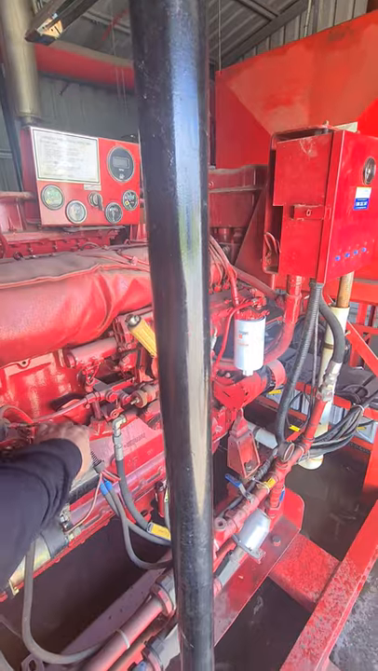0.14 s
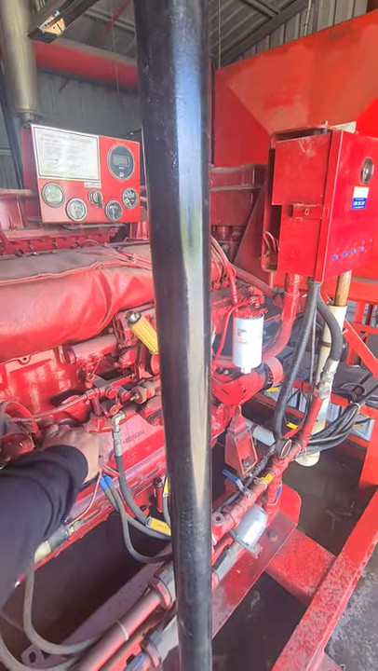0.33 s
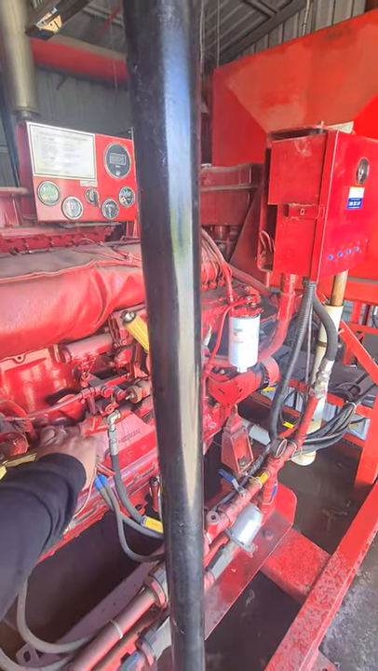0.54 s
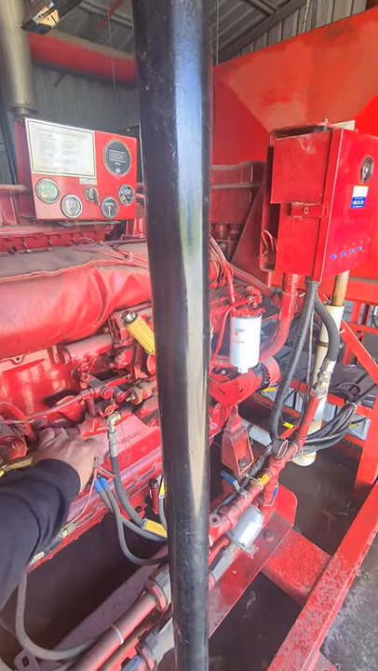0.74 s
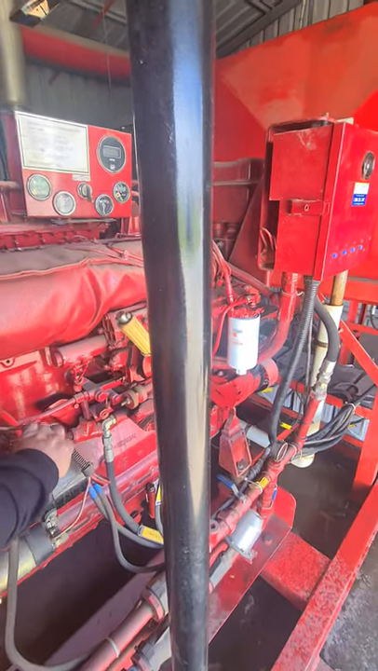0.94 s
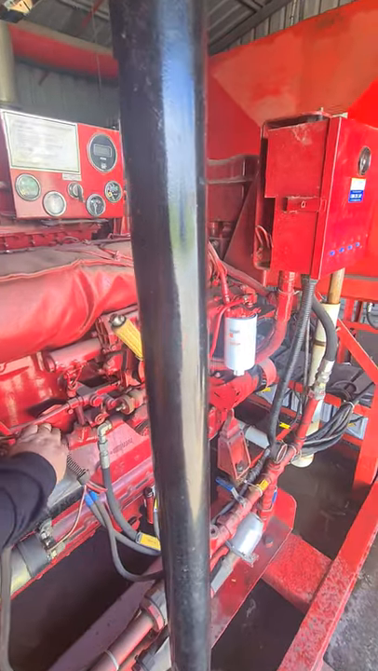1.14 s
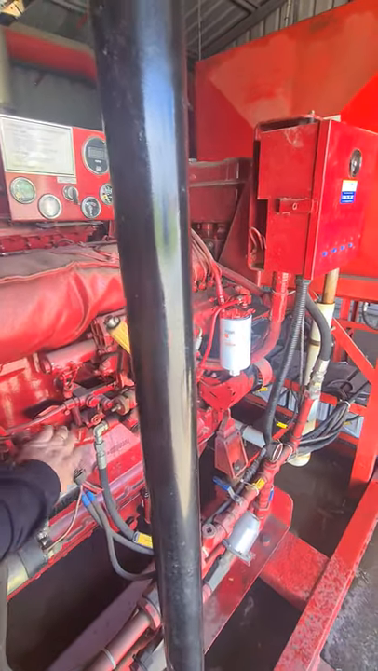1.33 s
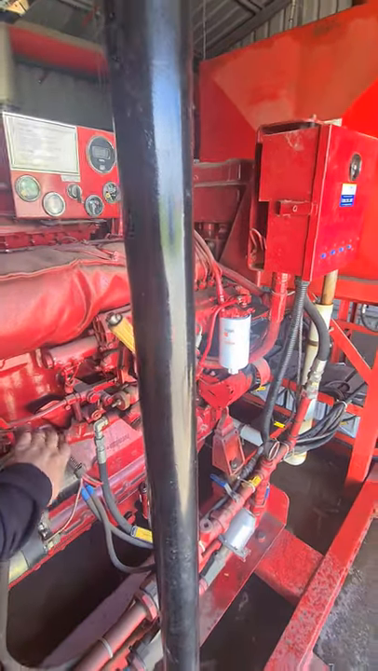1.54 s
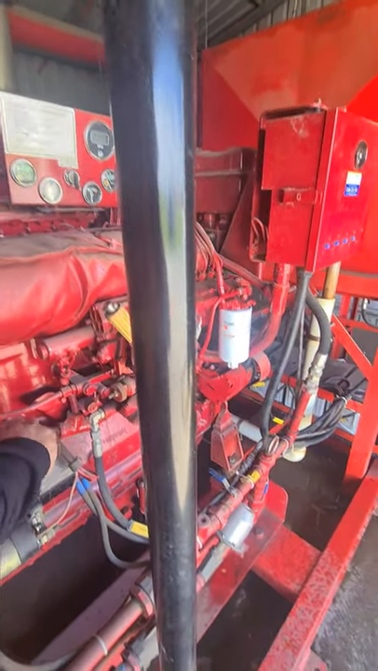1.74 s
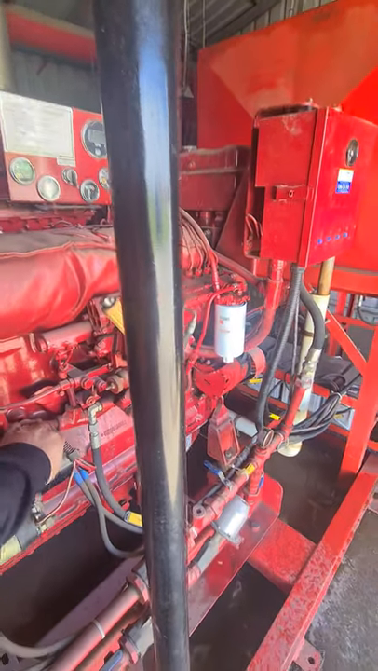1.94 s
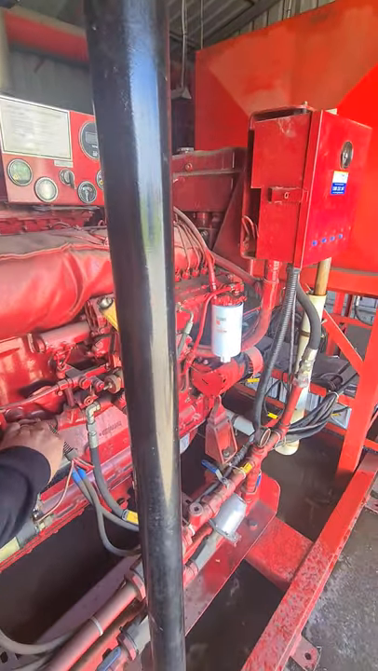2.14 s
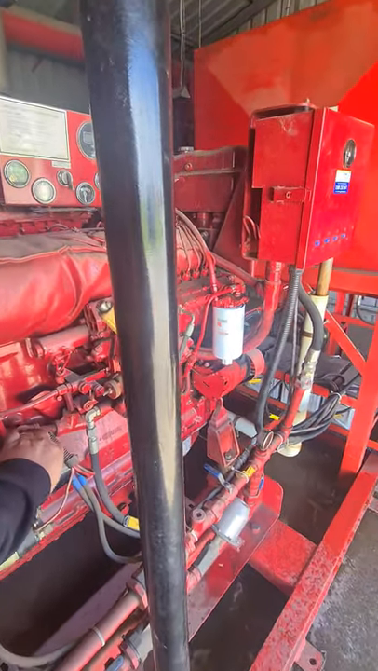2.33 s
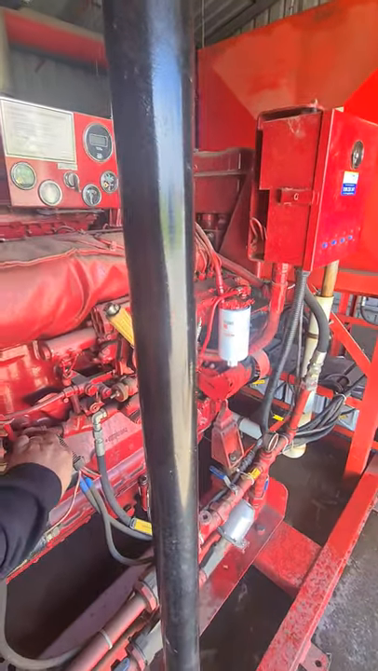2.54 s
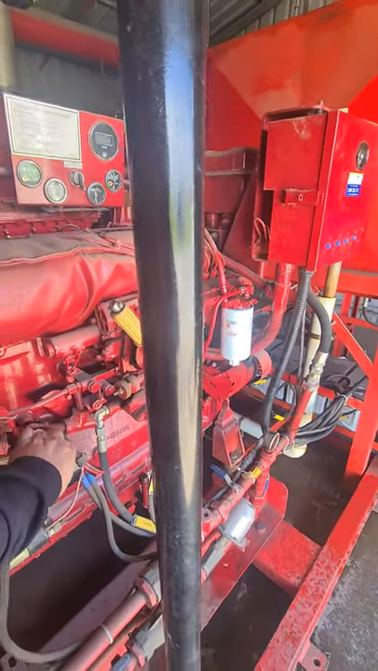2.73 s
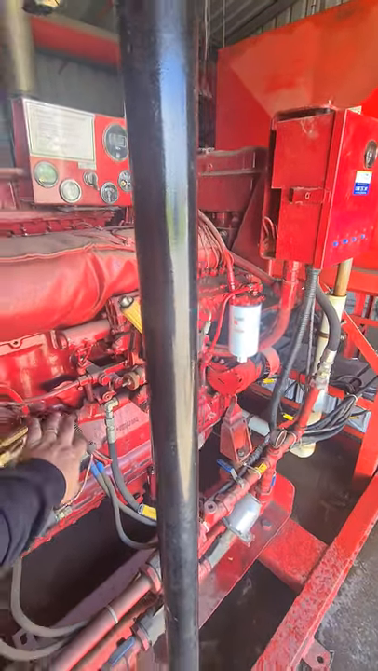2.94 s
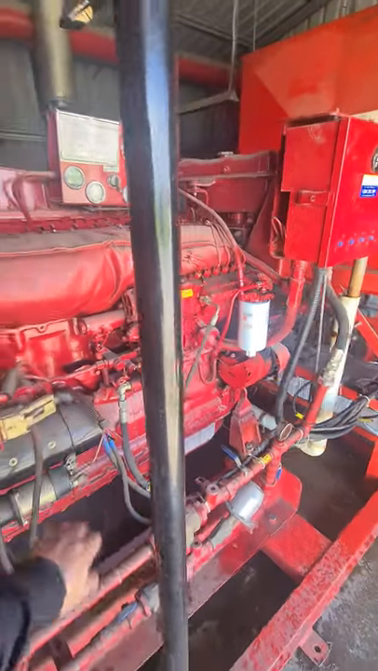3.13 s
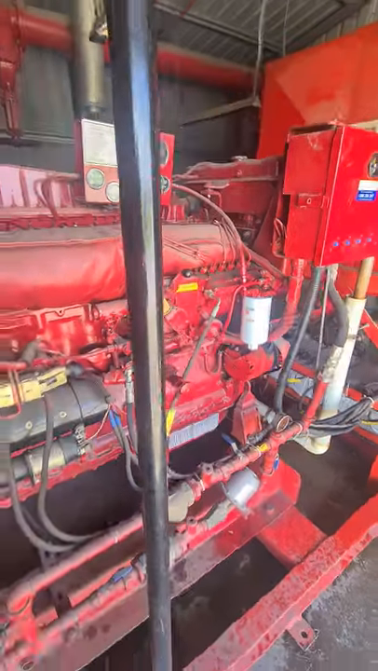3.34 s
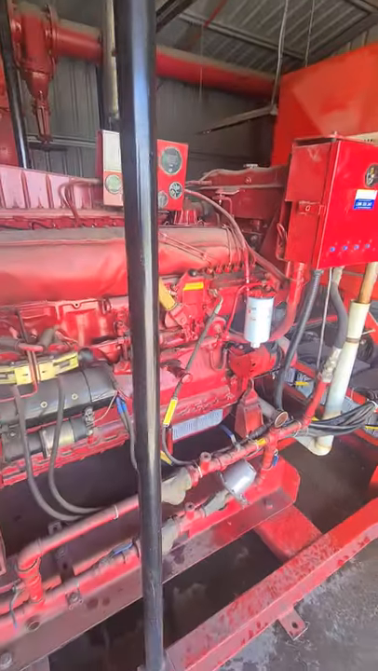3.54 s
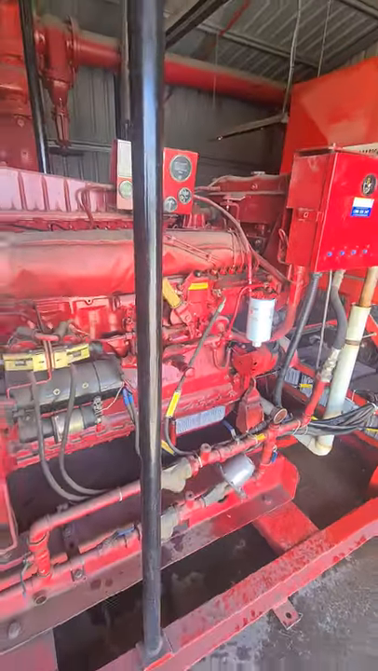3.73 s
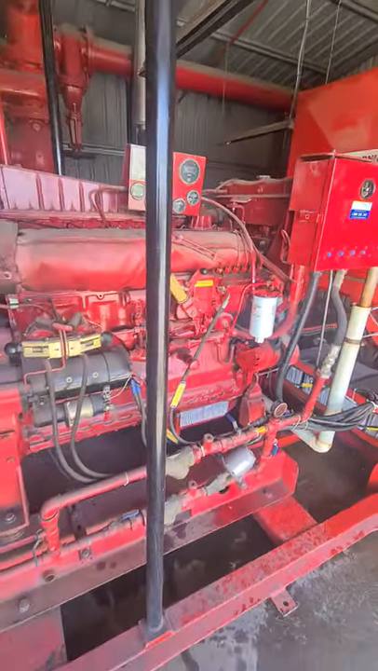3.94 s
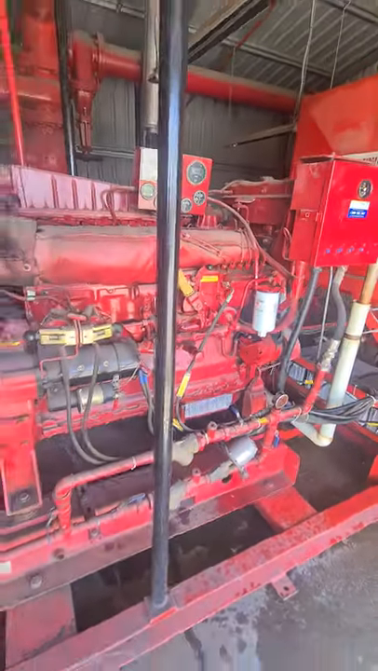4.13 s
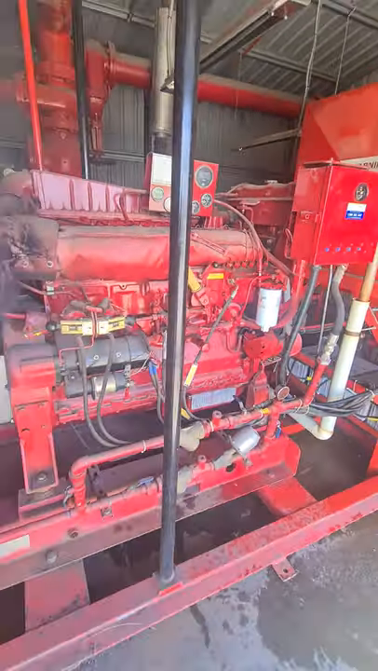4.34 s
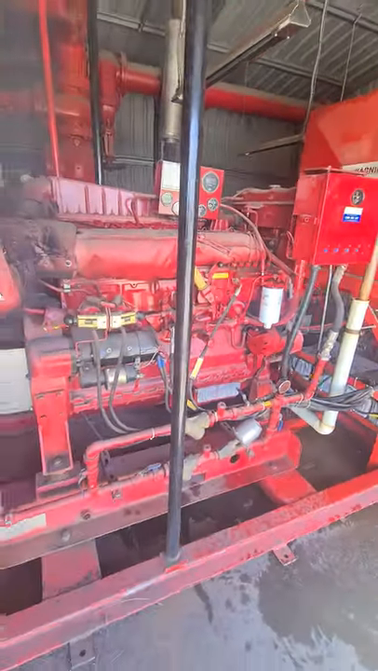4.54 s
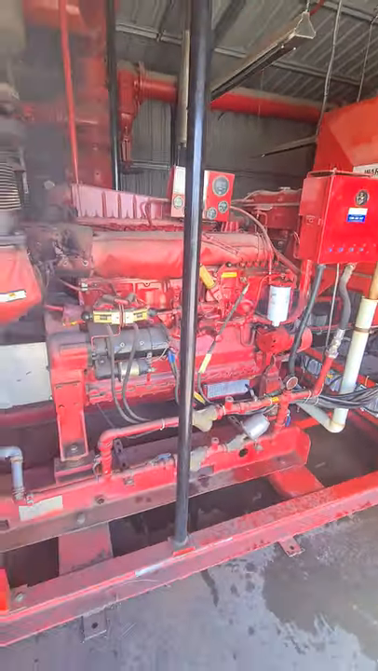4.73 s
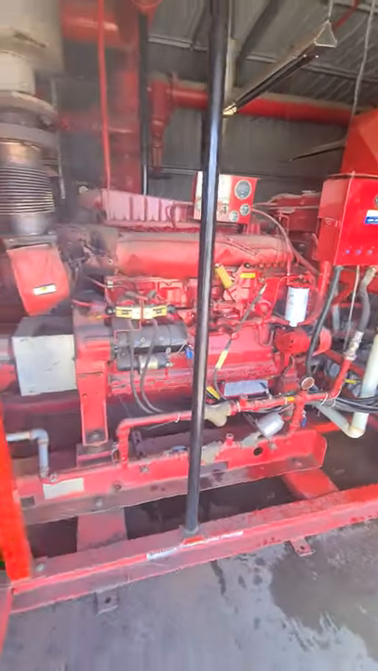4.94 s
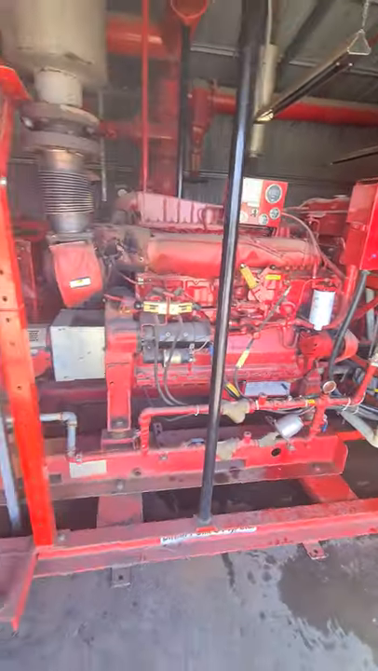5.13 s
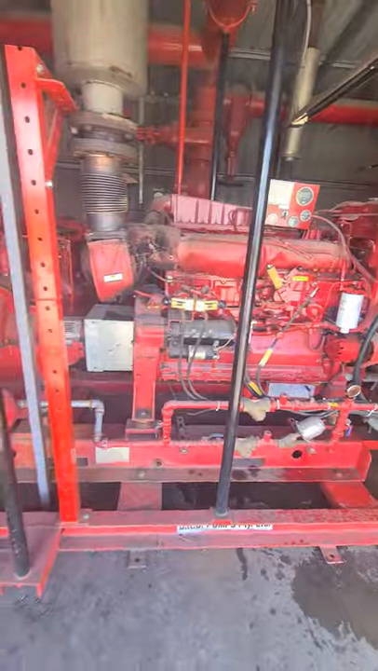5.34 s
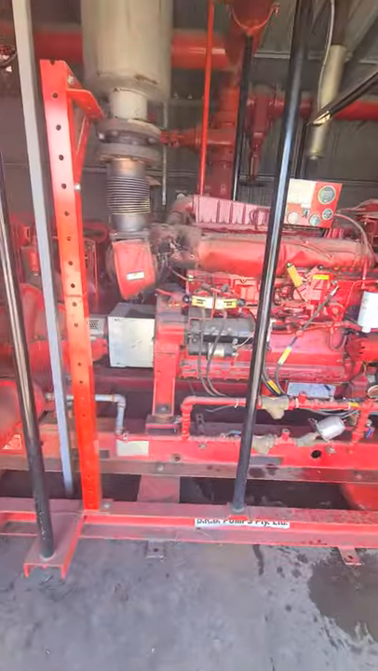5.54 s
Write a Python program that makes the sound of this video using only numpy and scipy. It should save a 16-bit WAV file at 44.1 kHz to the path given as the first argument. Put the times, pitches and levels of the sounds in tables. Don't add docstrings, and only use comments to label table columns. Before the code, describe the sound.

A low, quiet hum fills a steel pump house, heard through a close stereo microphone. At 0.3 s a few light lever clicks sound. Around 0.95-1.1 s hard metal cracks and a heavy thud mark the starter pinion slamming in; it slips, with two faint, very high squeals at 1.2-1.4 s and smaller knocks to 1.5 s. After a lull, light ticks at 1.95 s lead to a second, heavier clunk at 2.1-2.2 s, the casing shaking with rough gear noise. Cranking from 2.45 s becomes firing by 2.6 s; low separate puffs quicken and merge as the diesel climbs, with repeating valve clatter, pulsing hiss and a fluttering high intake whistle. One sharp clack lands at 3.03 s. Speed peaks slightly near 4.5 s and settles into a dense, steady drone; the whistle fades. From 4.8 s the listener steps back, slightly softening the block noise until the end at about 5.7 s.

```python
import sys
import numpy as np
from scipy import signal
from scipy.io import wavfile
from scipy.ndimage import uniform_filter1d

SR = 44100
rng = np.random.default_rng(int(sys.argv[2]) if len(sys.argv) > 2 else 0)


def makeup_ratio(level_db):
    decades = np.asarray(level_db, float) / 20
    return 10 ** decades


def inscribe(sig):
    pcm = np.round(np.clip(np.atleast_2d(sig).T, -1, 1) * 32767)
    wavfile.write(sys.argv[1], SR, pcm.astype(np.int16))


N = 250929
TIME = np.arange(N) / SR
CYLINDERS = 6
GOVERNED_PER_S, SETTLES_S, SETTLE_TIME_S = 108, 4.25, 0.27


def rms_one(x):
    return x / np.sqrt(np.mean(x ** 2) + 1e-20)


def in_time(rows):
    s, *columns = np.transpose(rows)
    inside = np.clip(np.minimum(TIME - s[0], s[-1] + 0.05 - TIME) / 0.008, 0, 1)
    return [np.interp(TIME, s, column) for column in columns], inside


def at_hz(points, hz):
    points_hz, values = np.transpose(points)
    return np.interp(np.log(hz), np.log(points_hz), values)


def drift(rate_hz):
    r = np.exp(-128 * np.pi * rate_hz / SR)
    slow = signal.lfilter([1], [1, -2 * r, r * r], rng.standard_normal(N // 64 + 1002))[1000:]
    return np.interp(np.arange(N) / 64, np.arange(len(slow)), rms_one(slow))


def filtered(x, order, hz, kind):
    return signal.sosfilt(signal.butter(order, hz, kind, fs=SR, output="sos"), x)


def resonance(x, hz, width_hz):
    r = np.exp(-np.pi * width_hz / SR)
    zeros = np.array([1, 0, -1]) * (1 - r * r) / 2
    return signal.lfilter(zeros, [1, -2 * r * np.cos(2 * np.pi * hz / SR), r * r], x)


# (frequency [Hz], correlation [-1 to 1])
LIKENESS = [(60, 0.99), (130, 0.95), (290, 0.94), (640, 0.33), (1410, -0.062), (3100, -0.018),
            (6820, 0.033), (15000, -0.13)]
# (frequency [Hz], difference [dB])
LEAN = [(60, -1.5), (130, -1.5), (290, -2.5), (640, -3), (1410, 0.5), (3100, -1), (6820, 6.5),
        (15000, -4.5)]


def spread(mid, side, hz):
    alike = np.clip(at_hz(LIKENESS, hz), -1, 1)
    lean = makeup_ratio(at_hz(LEAN, hz) / 2 * np.array([[1], [-1]]))
    return lean * (np.sqrt(1 + alike) * mid + np.sqrt(1 - alike) * side * [[1], [-1]]) / np.sqrt(2)


def coloured(source, spectrum, splits_hz, levels_db, patchy_db):
    edges = 28 * 2 ** (np.arange(29) / 3)
    centres = np.sqrt(edges[1:] * edges[:-1])
    region = np.searchsorted(splits_hz, centres)
    power = makeup_ratio(2 * at_hz(spectrum, np.minimum(centres, SR / 3))) * np.diff(edges)
    gains, out = [makeup_ratio(db) for db in levels_db], 0
    for k, hz in enumerate(centres):
        mid, side = rms_one(filtered(source(k, hz), 2, edges[k:k + 2], "band"))
        share = np.sqrt(power[k] / power[region == region[k]].sum())
        level = share * gains[region[k]] * makeup_ratio(patchy_db * drift(6.2))
        out = out + spread(mid, side, hz) * level
    return out


# (frequency [Hz], density [dB per Hz])
HUM = [(15, -60), (25, -19), (48, -14.5), (70, -3.5), (128, -24), (273, -22.5), (378, -31.5), (496, -29),
       (568, -29), (617, -29.5), (878, -34.5), (1030, -34), (1980, -39), (5570, -47.5), (16500, -75.5)]


def hum():
    white = rng.standard_normal((2, 2, N))
    return coloured(lambda k, hz: white[k % 2], HUM, [], [-37], patchy_db=-3.0)


def pump_house(x, t60_s, cut_hz):
    t = TIME[:int(SR * 0.9)]
    tail = rng.standard_normal((2, len(t))) * makeup_ratio(-60 * t / t60_s) * (t > 0.004)
    tail = filtered(tail, 1, cut_hz, "low")
    tail = tail / np.sqrt(np.sum(tail ** 2, axis=1, keepdims=True))
    return signal.fftconvolve(x, tail, axes=1)[:, :N]


# (time [s], peak [dB], top above 7 kHz [dB], part struck [Hz])
TICKS = [(0.3007, -37, -55, 3000), (0.336, -23, -36, 6630), (0.343, -14.5, -27, 4030),
         (0.3476, -16.5, -36, 6600), (0.3602, -21, -40, 2100), (0.3654, -21, -35, 3750),
         (0.919, -30, -48, 5350), (0.9869, -5.5, -11.5, 3040), (1.0035, 4, -7, 2990),
         (1.022, 4.5, -40, 480), (1.0998, -4, -3.5, 3570), (1.2732, -7, -27, 1680),
         (1.3044, -15, -21, 2120), (1.4711, -15, -35, 1400), (1.922, -36, -64, 1450),
         (1.934, -25, -47, 2490), (1.948, -37, -35, 5100), (1.958, -18.5, -29, 5070),
         (1.9704, -28, -40, 5000), (2.1249, -2.5, -26, 5100), (2.1368, 2, -11, 6200), (2.155, -4, -12, 895),
         (2.166, 3.5, -5, 2730), (2.1714, -1.5, -22, 2200), (2.184, 6, -40, 258), (2.3361, -11, -26, 2060),
         (2.3535, -12, -26, 2080), (2.4024, -13, -31, 5900), (2.61, -23, -36, 5800),
         (3.033, -2.5, -9, 2130)]
# (frequency [Hz], level [dB], t60 [s])
LEVER = [(1545, -6, .035), (2130, -2, .045), (2990, -4, .03), (4050, -3, .03), (5350, -4, .03),
         (6000, -4, .03), (6600, -4, .022)]


def ticks():
    out, after_s = np.zeros((2, N)), TIME[:SR // 4]
    modes_hz = np.array(LEVER)[:, 0]
    white = rng.standard_normal((len(TICKS), 2, len(after_s)))
    luck = rng.standard_normal((len(TICKS), len(LEVER)))
    for (s, peak_db, top_db, part_hz), noise, chance in zip(TICKS, white, luck):
        t60_s = 0.045 + 24.0 / part_hz
        ring_db = -12 - 0.2 * peak_db
        fall = (1 - np.exp(-after_s / 0.0011)) * makeup_ratio(-60 * after_s / t60_s)
        body = filtered(noise, 2, [part_hz / 4, min(part_hz * 2, 7500)], "band")
        top = filtered(noise, 3, 7000, "high")
        sound = makeup_ratio(peak_db - 15) * fall * rms_one(body)
        sound += makeup_ratio(top_db - 5.5) * fall * rms_one(top)
        octaves_off = np.abs(np.log2(modes_hz / part_hz))
        reach_db = 2 * chance - np.minimum(30 * octaves_off, 8)
        for (hz, db, ring_t60_s), near_db in zip(LEVER, reach_db):
            r, w = makeup_ratio(-60 / (ring_t60_s * SR)), 2 * np.pi * hz / SR
            ring = signal.lfilter([0, np.sin(w)], [1, -2 * r * np.cos(w), r * r], noise * fall ** 4)
            sound += makeup_ratio(peak_db + ring_db + db + near_db) * ring / np.abs(ring).max()
        start = round(s * SR)
        out[:, start:start + len(after_s)] += sound
    return out


def whistle(track, gate, half_width_hz, wander_hz):
    (hz, db), on = in_time(track)
    narrow = signal.butter(2, half_width_hz, fs=SR, output="sos")
    slow = signal.sosfilt(narrow, rng.standard_normal((2, 2, N)))
    angle = 2 * np.pi * np.cumsum(hz + wander_hz * drift(18.0)) / SR
    band = rms_one(slow[0] * np.cos(angle) + slow[1] * np.sin(angle))
    return on * gate ** 2 * makeup_ratio(db + 1.2 * drift(20.0)) * spread(*band, 6400)


# (time [s], frequency [Hz], level [dB])
SQUEAL = [
    (1.17, 10000, -48),
    (1.24, 10000, -44),
    (1.29, 9900, -63),
    (1.35, 10000, -41),
    (1.38, 10000, -65),
]


def pinion_squeal():
    return whistle(SQUEAL, 1, 250, wander_hz=50)


# (time [s], strength [dB], held [s], brightness [dB])
STARTER = [(0.93, -45, 0.11, 12), (0.998, -12, 0.065, 4.5), (1.096, -13.5, 0.016, -8),
           (1.262, -9.5, 0.016, -7.5), (1.34, -21, 0.14, -4), (1.468, -19.5, 0.029, -8),
           (1.93, -54, .05, -1), (2.16, -9.5, 0.03, -0.5), (2.23, -16.5, 0.08, -2.5),
           (2.378, -19, 0.016, 8), (2.5, -19, 0.18, -9), (2.6, -22.5, 0.07, 7.5), (2.69, -23, 0.076, 9.5)]
# (above the blow [dB], rise [s], share of the hold [0-1], fall [dB per s], share of brightness [0-1])
PARTS = [
    (-0.5, 0.03, 1, 65, 0.31),
    (-1, 0.02, 0.65, 67.5, 0.34),
    (-9.5, 0.01, 0.43, 53.5, 0.91),
    (-16, 0.0072, 0.24, 320, 0.88),
]


def blows_db():
    power = np.full((len(PARTS), N), 1e-12)
    for s, db, held_s, bright_db in STARTER:
        at = round(s * SR)
        t = TIME[:min(SR, N - at)]
        for k, (above_db, rise_s, hold, fall, bright) in enumerate(PARTS):
            fallen_db = fall * np.maximum(t - rise_s - hold * held_s, 0)
            level_db = db + above_db + bright * bright_db - fallen_db
            rise = np.minimum(t / max(rise_s, 0.001), 1)
            power[k, at:at + len(t)] += rise ** 4 * makeup_ratio(2 * level_db)
    return 10 * np.log10(power)


# (frequency [Hz], density [dB per Hz])
CASING = [(18, -47), (30, -45.5), (98, -1), (190, -8.5), (276, -4.5), (676, -14.5), (752, -13), (953, -23),
          (2100, -16), (3970, -33), (6050, -31), (10300, -48), (12000, -44.5), (15200, -52), (16500, -40)]
# (frequency [Hz], width [Hz], level [dB])
FRAME = [(96, 80, -4), (130, 270, 9), (279, 69, -1), (385, 22, -0.5), (2150, 500, -3), (5900, 500, -22)]


def starter():
    white = rng.standard_normal((2, 2, N))
    struck = rng.random((2, N)) < 250 / SR
    size = makeup_ratio(3.6 * np.minimum(rng.exponential(1, (2, N)), 2))
    knocks = struck * size * rng.choice([-1, 1], (2, N))
    drive = knocks + 1e-9 * white[0]
    frame = sum(makeup_ratio(db) * rms_one(resonance(drive, hz, width_hz)) for hz, width_hz, db in FRAME)
    rough = 0.5 * rms_one(knocks) + white + makeup_ratio(-3.5) * rms_one(frame)
    return coloured(lambda k, hz: rough[k % 2], CASING, [350, 1500, 7000], blows_db(), patchy_db=2.0)


# (time [s], frequency [Hz], level [dB])
WHISTLE = [(2.55, 7965, -42), (2.72, 7745, -35.5), (2.95, 7800, -33.5), (3.2, 7720, -35), (3.5, 7760, -32),
           (3.85, 7720, -30), (4.23, 7700, -26.5), (4.3, 7720, -33), (4.52, 7750, -41), (4.8, 7700, -42)]
# (time [s], frequency [Hz], level [dB])
UPPER_WHISTLE = [(3.35, 8160, -49), (4.25, 8400, -44), (4.29, 8300, -31), (4.5, 8600, -46)]


def intake_whistle(gate):
    lower = whistle(WHISTLE, gate ** 1.6, 190, wander_hz=50)
    return lower + whistle(UPPER_WHISTLE, gate, 200, wander_hz=50)


def firing_gate(turns, firing):
    since_firing_s = ((CYLINDERS * turns + 0.1) % 1) / firing
    gate = 0.9 + np.exp(-since_firing_s / 0.012)
    return gate / np.sqrt(uniform_filter1d(gate ** 2, size=4410))


def looped(turns, count):
    angles, sizes = rng.random((2, count)), rng.standard_normal((2, count))
    out = np.zeros((2, N + 1))
    for ear in range(2):
        every = (np.arange(int(turns[-1]) + 1)[:, None] + angles[ear]).ravel()
        at = np.interp(every, turns, np.arange(N), right=N).round().astype(int)
        np.add.at(out[ear], at, np.resize(sizes[ear], len(at)))
    return out[:, :N]


def valve_gear(turns, firing):
    walk = 1.3 * TIME
    blows = np.cos(walk) * looped(turns, count=400) + np.sin(walk) * looped(turns, count=400)
    blows = blows / np.sqrt(firing)
    return blows / blows[:, -SR:].std()


# (frequency [Hz], density [dB per Hz])
RUNNING = [(26, -51), (45, -78), (96, -4.5), (200, -0.5), (255, -3), (310, -14.5), (396, -12), (482, -16.5),
           (730, -15.5), (1080, -15), (1720, -16), (3660, -27), (7630, -27), (9280, -50), (15500, -58.5)]


def running_noise(turns, firing, repeat, gate, levels_db):
    blows, white = valve_gear(turns, firing), rng.standard_normal((2, 2, N))
    locked = [(400, 1), (1000, 0.9), (1500, 0.8), (2500, 0.6), (4500, 0.1)]      # (Hz, how far it repeats)
    puffing = [(60, 1), (250, 0.9), (700, 0.1), (5000, 0.7)]      # (Hz, share gated)

    def source(k, hz):
        share, puff = at_hz(locked, hz) * repeat, at_hz(puffing, hz)
        clatter = (hz > 1050) * np.sqrt(share) * blows
        return clatter + np.sqrt(1 - share) * white[k % 2] * (1 - puff + puff * gate)
    return coloured(source, RUNNING, [300, 1050, 1250, 8500], levels_db, patchy_db=1.12)


def rocking_bed(turns, firing, burning):
    slow = np.clip(1 - firing / 75, 0, 1)
    rocking = makeup_ratio(-20) * burning * slow * np.sin(2 * np.pi * CYLINDERS * turns)
    return filtered(rocking, 3, 42, "high")


# (frequency [Hz], width [Hz], level [dB])
PIPES = [(110, 10, -2.5), (166, 40, -6.5), (235.6, 20, 2), (244, 16, -2), (376, 12, -6), (580, 65, -3),
         (725, 24, 1)]


def through_pipes(hz):
    grid_hz = np.geomspace(10, 1200, num=300)
    path = makeup_ratio(-9.5) ** 2
    path = path + sum(makeup_ratio(2 * db) / (1 + (2 * (grid_hz - at) / width_hz) ** 2) for at, width_hz, db in PIPES)
    path = path * grid_hz ** 4 / (grid_hz ** 4 + 45.0 ** 4)
    return np.sqrt(np.interp(hz, grid_hz, path) / np.interp(hz[-1], grid_hz, path))


def start_angle(k):
    luck, pulse_order = rng.random(), 12
    return -0.045 * (k - pulse_order) ** 2 if k < 1.4 * pulse_order else luck


def orders(table, turns, firing, repeat):
    out = 0
    for k, db in table:
        hz = k * firing / CYLINDERS
        swell = through_pipes(hz)
        angle = 2 * np.pi * (k * turns + start_angle(k))
        steady = 0.4 if k % 3 == 0 else 1
        uneven_db = (9 * steady * (1 - repeat) + k / 25) * drift(3.0)
        out = out + spread(np.sin(angle), np.cos(angle), hz[-1]) * swell * makeup_ratio(db + uneven_db)
    return out / np.sqrt(uniform_filter1d(np.mean(out ** 2, axis=0), size=13230))


STRONG_ORDERS = [6, 9, 12, 21]
# (on settling [dB], change as the listener steps back [dB per s])
STRONG = [(-20, -4), (-22, -4.5), (-20, 1), (-36.5, 10.5)]


def strong_lines(turns, firing, repeat):
    out = 0
    for k, (db, walk_db) in zip(STRONG_ORDERS, STRONG):
        hz = k * firing / CYLINDERS
        angle = 2 * np.pi * (k * turns + start_angle(k))
        waver_db = 5.0 * (1 - repeat) * drift(4.0)
        level_db = db + walk_db * np.clip(TIME - SETTLES_S, 0, 1) + waver_db
        gain = np.sqrt(2) * makeup_ratio(level_db) * through_pipes(hz) * repeat ** 0.63
        out = out + gain * spread(np.sin(angle), np.cos(angle), hz[-1])
    return out


# (multiple of the four-stroke cycle, level [dB])
EXHAUST = [(1, -49), (2, -30), (3, -28), (4, -27), (5, -24), (7, -15), (8, -12), (10, -21), (11, -11),
           (13, -12), (14, -8), (15, -17), (16, -19), (17, -21), (18, -19), (20, -18), (22, -19), (23, -20),
           (24, -19), (25, -19), (31, -19), (32, -19), (33, -18), (34, -20), (40, -14), (41, -16),
           (42, -18), (44, -20)]


def weak_lines(turns, firing, repeat, exhaust_db, block_db):
    listed = dict(EXHAUST)
    weak = [(k, listed.get(k, -25)) for k in range(1, 59) if k not in STRONG_ORDERS]
    low = makeup_ratio(exhaust_db - 7.0) * orders(weak[:13], turns, firing, repeat)
    return low + makeup_ratio(block_db - 5.0) * orders(weak[13:], turns, firing, repeat)


# (time [s], firing rate [per s])
SPEED = [(2.45, 14), (2.6, 22), (2.78, 31), (3.07, 50.7), (3.28, 64.1), (3.61, 80.8), (3.89, 92.7),
         (4.08, 99.2), (4.36, 108.2), (4.42, 109.3), (4.54, 109.4), (4.78, 108.1), (5.35, 108.3),
         (5.69, 107.9)]
# (time [s], share of full combustion [0-1])
TAKE_UP = [
    (2.45, 0),
    (2.6, 0.57),
    (2.67, 0.66),
    (2.75, 0.82),
    (2.87, 0.99),
    (3.2, 1),
    (4.2, 0.96),
    (5.69, 0.96),
]
# (full level [dB], weaker before take-up [dB], loss stepping back [dB per s], loss at governed speed [dB])
LAYERS = [
    (-14.5, 10.5, 0.3, 1),
    (-17.5, 31, 1.9, -1.6),
    (-18.5, 15, 0.24, 0.52),
    (-28, 18, -0.6, 7),
]


def engine():
    (firing,), on = in_time(SPEED)
    (burning,), _ = in_time(TAKE_UP)
    speed = firing / GOVERNED_PER_S
    settled = np.clip((TIME - SETTLES_S) / SETTLE_TIME_S, 0, 1)
    repeat = 0.12 + 0.5 * speed + 0.3 * settled
    away_s = np.maximum(TIME - 4.77, 0)
    exhaust_db, block_db, clatter_db, hiss_db = [
        db - weak_db * (1 - burning) - loss * away_s - fast_db * speed
        for db, weak_db, loss, fast_db in LAYERS]
    turns = np.cumsum(firing * (TIME >= 2.45)) / SR / CYLINDERS + 1e-9 * TIME
    gate = firing_gate(turns, firing)
    levels_db = [exhaust_db - 6, block_db - 3, block_db - 9, clatter_db + 1, hiss_db]
    sound = np.sqrt(repeat) * weak_lines(turns, firing, repeat, exhaust_db, block_db)
    sound = sound + running_noise(turns, firing, repeat, gate, levels_db)
    sound = sound + rocking_bed(turns, firing, burning)
    sound = sound + burning ** 2 * strong_lines(turns, firing, repeat)
    return on * sound + intake_whistle(gate)


def scene():
    contacts = ticks()
    echo = makeup_ratio(-10) * pump_house(contacts, t60_s=0.45, cut_hz=5900)
    return hum() + contacts + echo + pinion_squeal() + starter() + engine()


def band_limit(x):
    return signal.sosfilt(signal.butter(12, 16800, fs=SR, output="sos"), x)


def record(dry):
    rounded = 1.4 * np.tanh(dry / 1.138)
    shelf = signal.sosfilt(signal.cheby2(16, 24, 15900, fs=SR, output="sos"), rounded)
    cut = signal.sosfilt(signal.cheby2(16, 60, 16850, fs=SR, output="sos"), shelf)
    return band_limit(cut)


dry = scene()
out = record(dry)
inscribe(out)
```